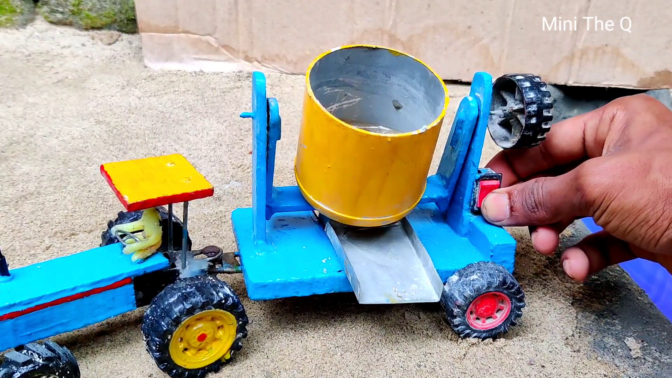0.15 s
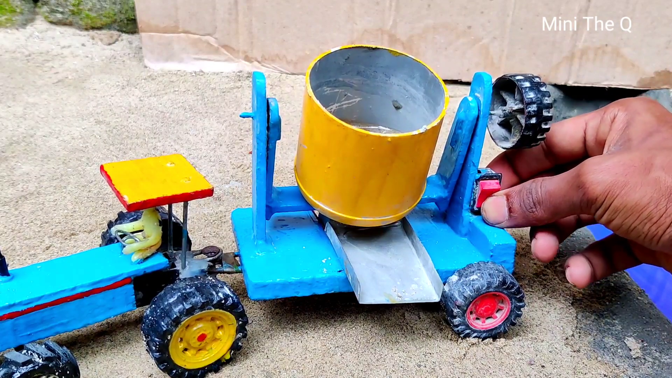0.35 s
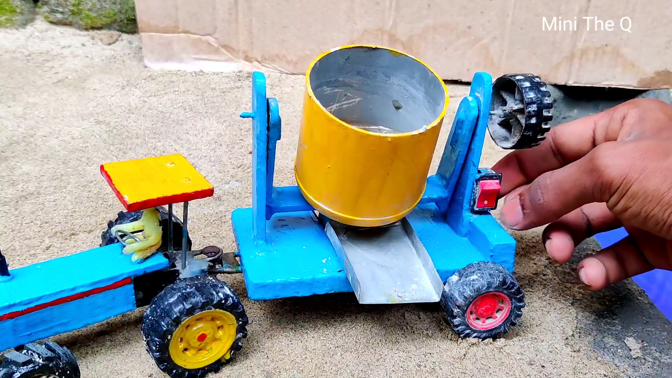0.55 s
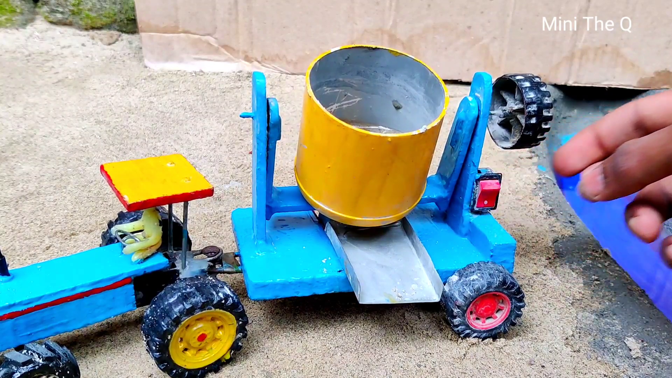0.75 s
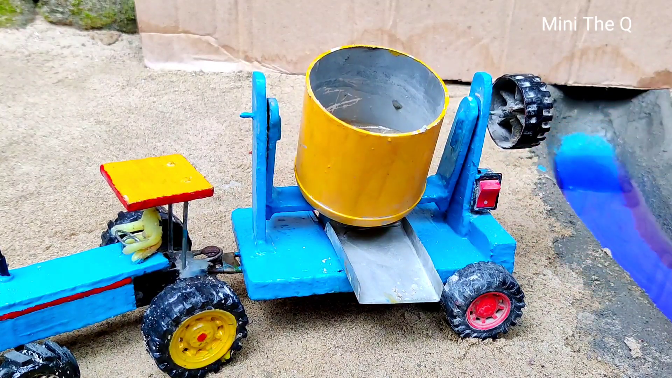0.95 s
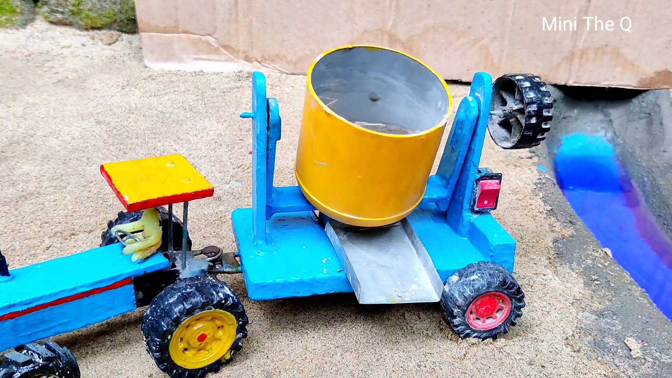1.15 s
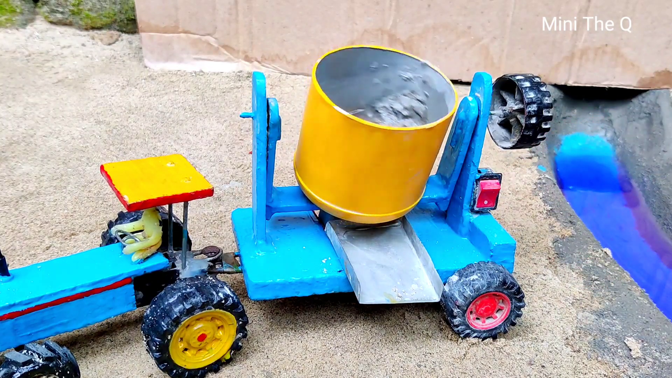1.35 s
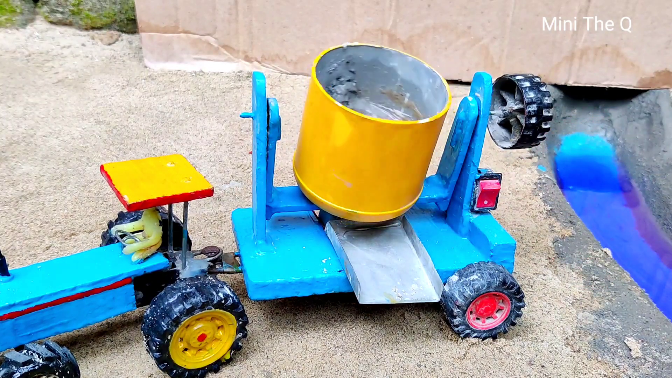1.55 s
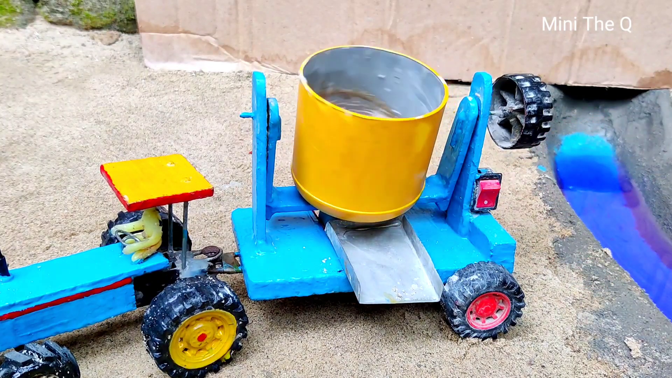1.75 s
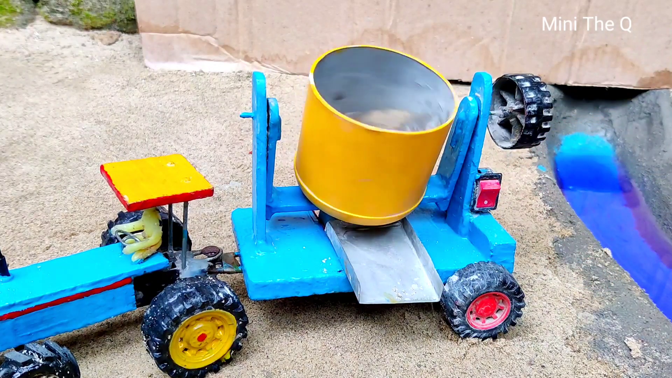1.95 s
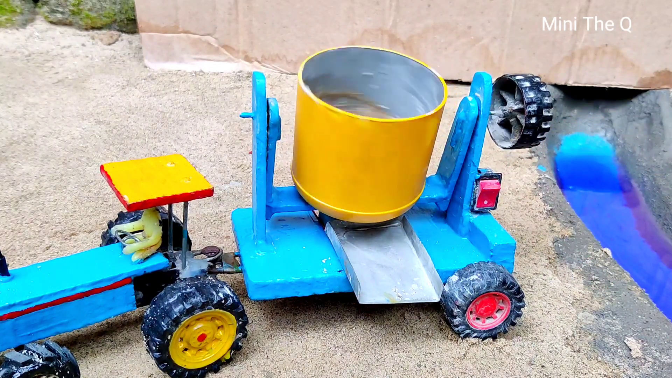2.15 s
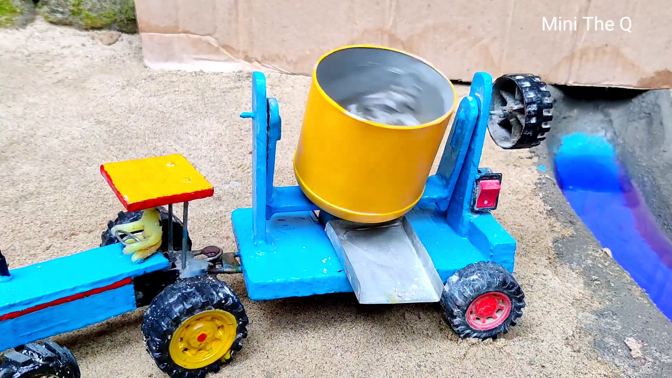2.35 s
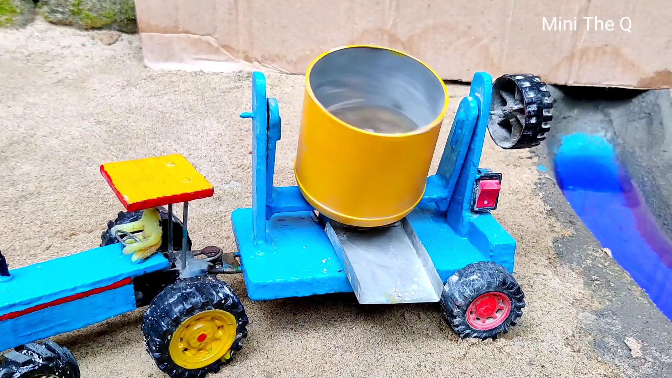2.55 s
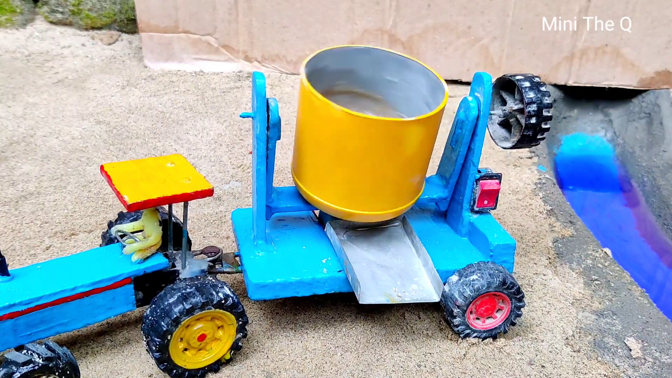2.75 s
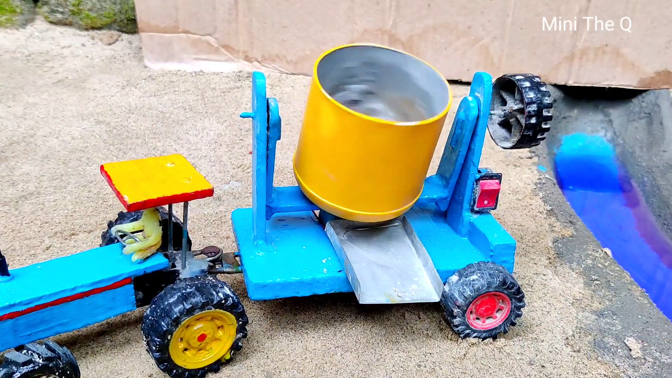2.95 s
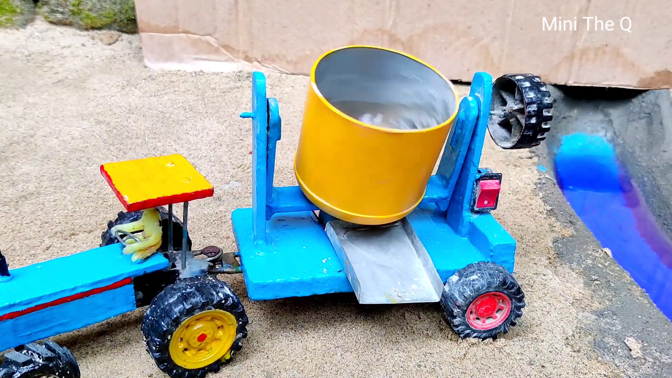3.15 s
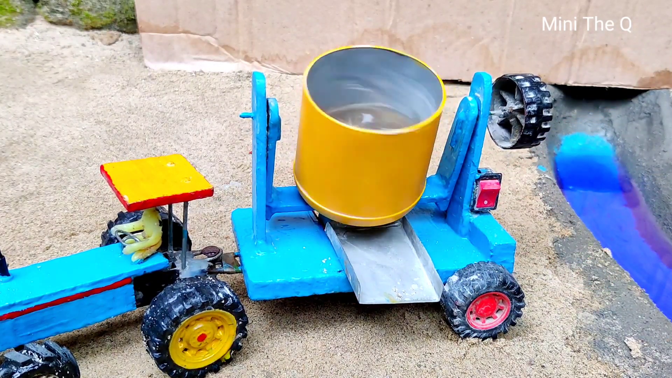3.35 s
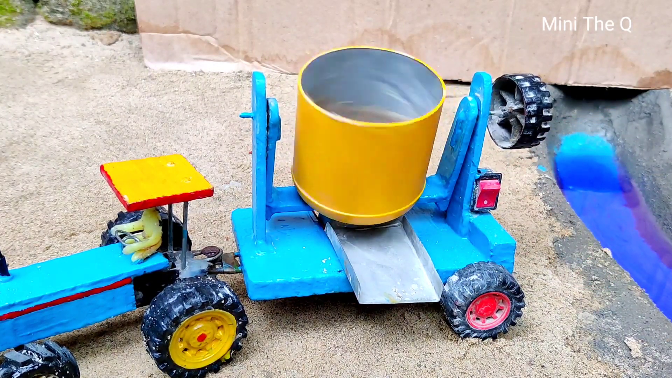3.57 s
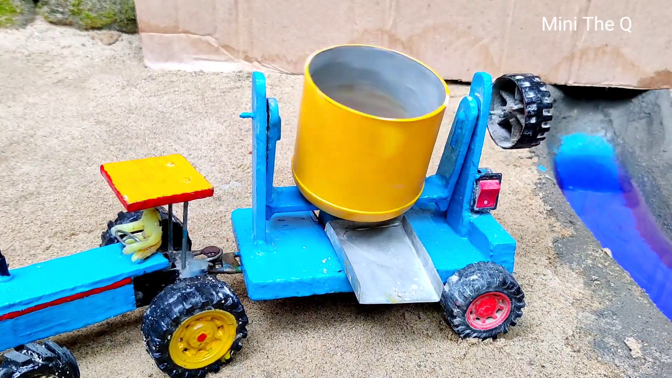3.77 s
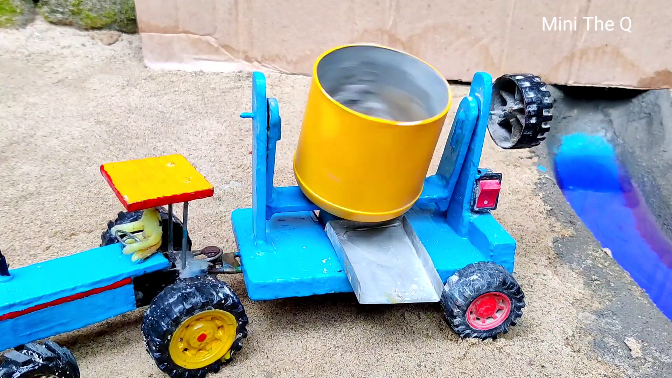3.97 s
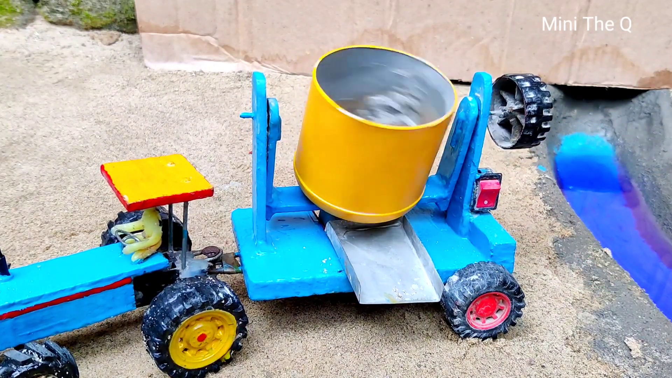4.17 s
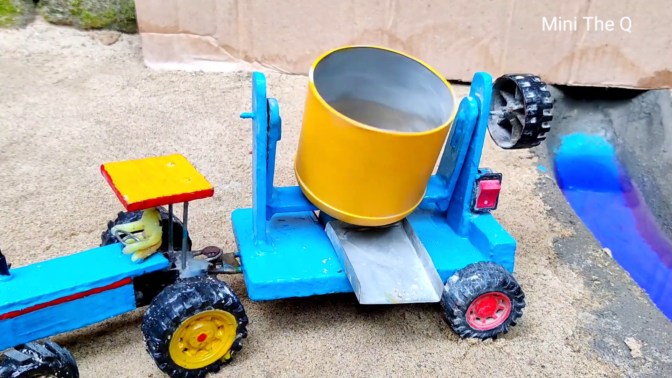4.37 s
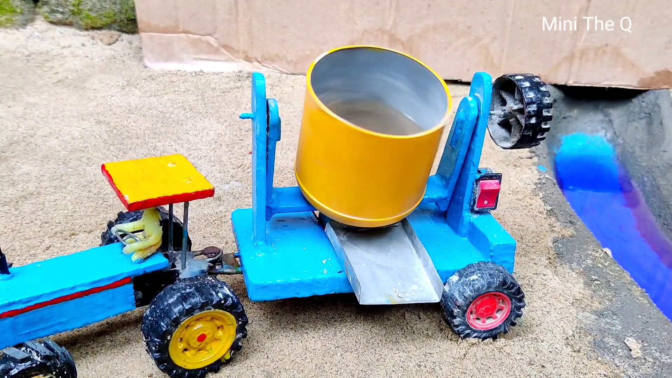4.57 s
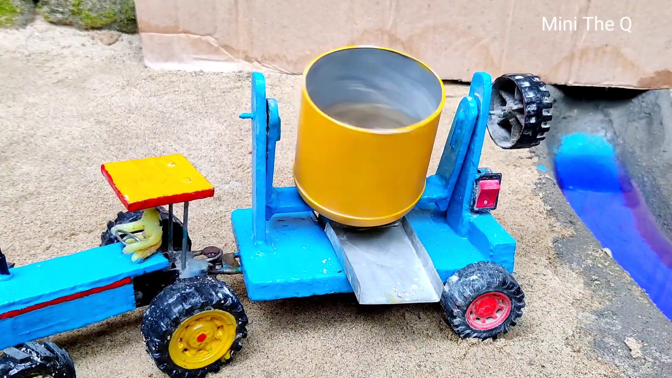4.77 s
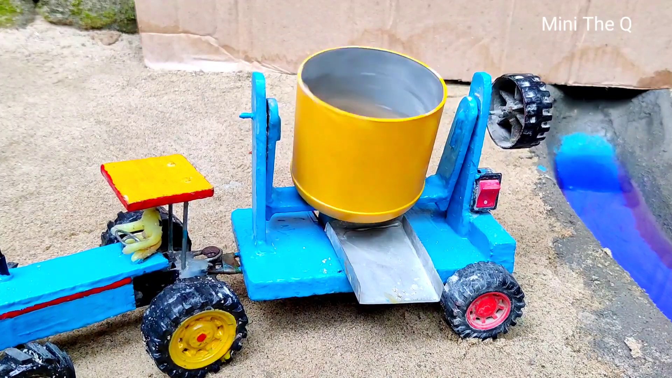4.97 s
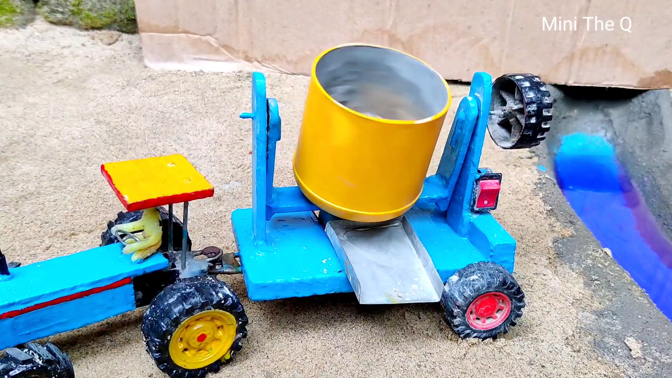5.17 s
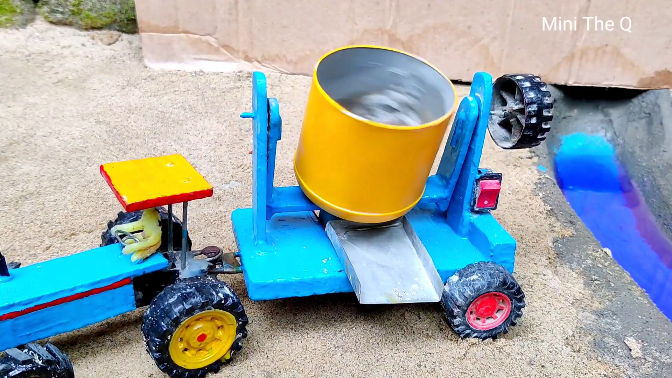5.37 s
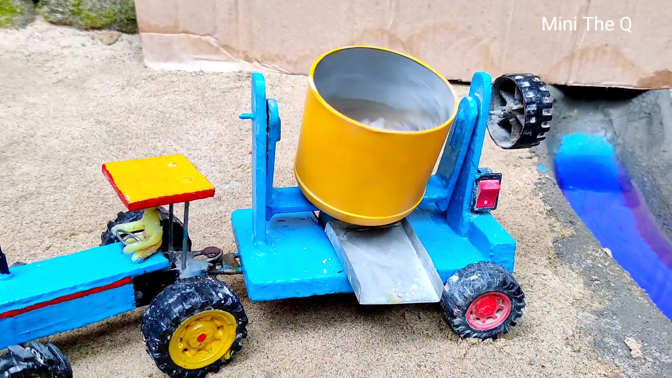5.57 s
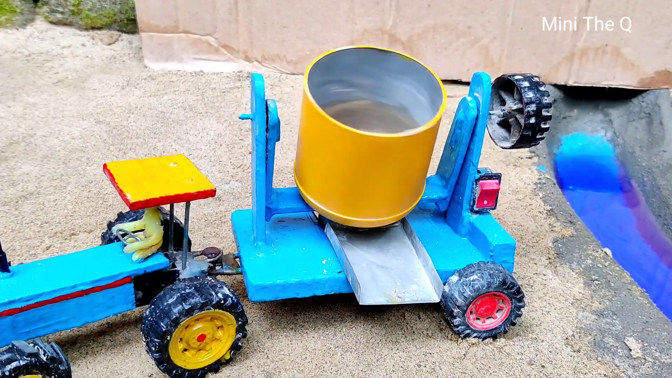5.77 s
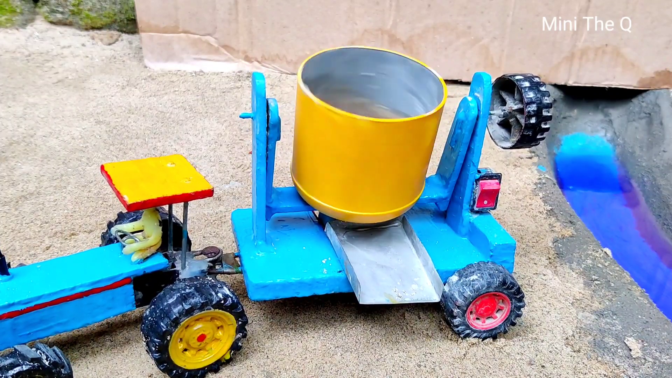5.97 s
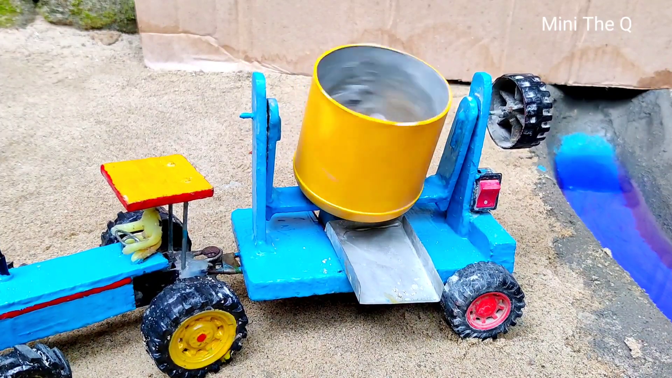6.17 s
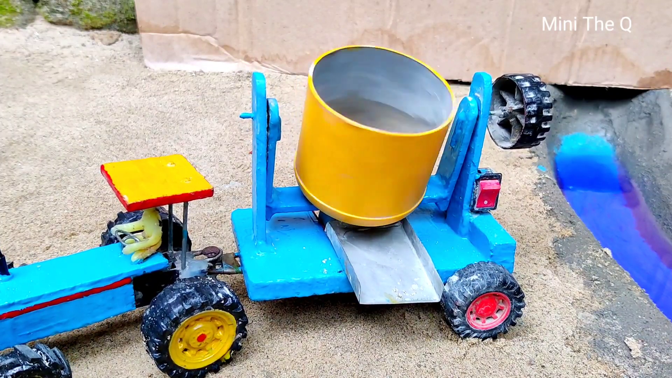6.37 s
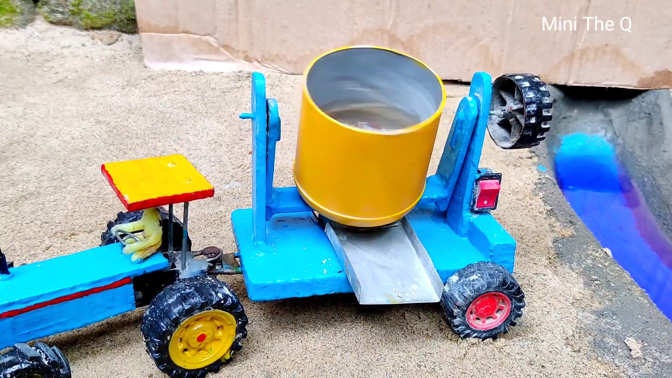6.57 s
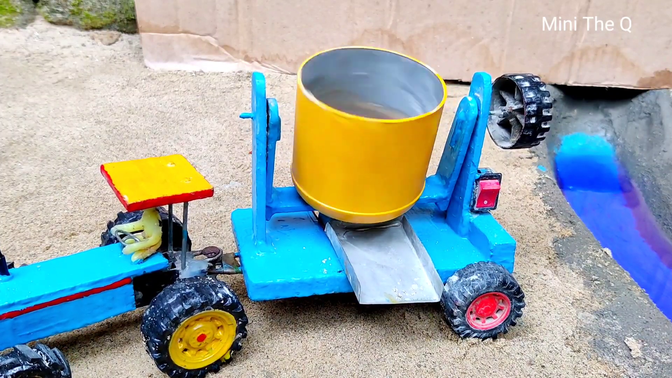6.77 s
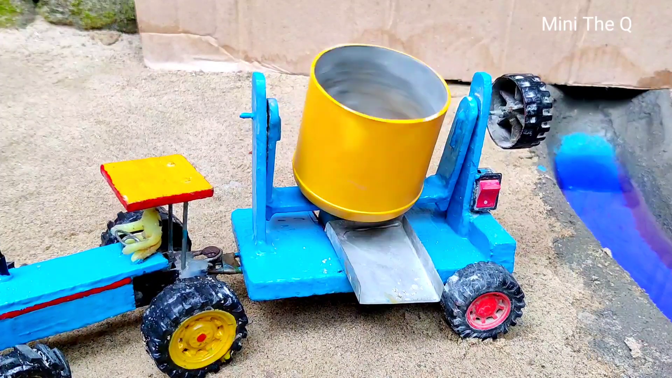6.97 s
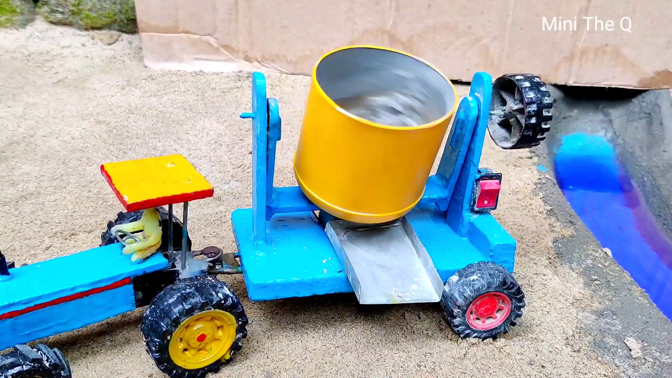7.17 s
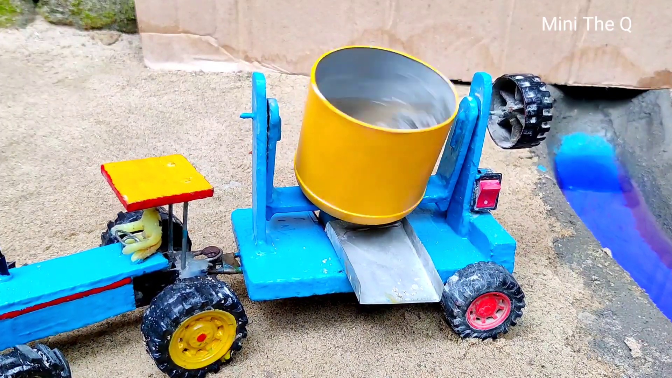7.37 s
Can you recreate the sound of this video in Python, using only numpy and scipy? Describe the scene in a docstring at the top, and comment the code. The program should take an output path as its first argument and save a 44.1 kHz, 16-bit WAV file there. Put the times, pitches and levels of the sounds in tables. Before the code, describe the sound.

The sound begins in a nearly silent yard. At about 0.4 seconds a switch snaps right at the microphone, loud and dry, with a brief low thud and a few faint finger touches on plastic. From 0.7 to 1.2 seconds a very faint, high horn toots three times far away. Just after 1 second a small electric motor gives a barely audible rising whirr. From 1.3 seconds a toy mixer drum starts knocking, softly at first, reaching full strength around 2.3 seconds. It then runs with a fast, even rattle of about ten knocks a second, varying in force. Sharp ticks and light pings on the drum wall fall between the knocks, with a few tiny squeaks between 2 and 3 seconds. Grit hisses inside, and the frame thumps over a low rumble. The mixer is close, mostly on the right, and continues until the end at about 7.4 seconds.

```python
"""In a quiet yard a switch snaps right at the microphone; then a horn sounds three times, far away.
After a second a small motor whirrs up and turns a toy mixer drum: the drive knocks twice a turn and
ticks between, grit hisses, late contacts ping on the drum wall, and the frame thumps on the sand.
The mixer stands at the right microphone port; the left one hears it later, weaker and thinner."""
import sys
import numpy as np
from scipy import signal
from scipy.fft import rfft, irfft
from scipy.io import wavfile
from scipy.ndimage import uniform_filter1d

SR = 44100
rng = np.random.default_rng(int(sys.argv[2]) if len(sys.argv) > 2 else 0)


def to_wav(sig):
    """Store sig (one row per channel, or 1-D mono) as 16-bit WAV at the path in sys.argv[1].

    Samples outside -1..1 are clipped; the rate is SR.
    """
    pcm = np.clip(np.atleast_2d(sig), -1, 1) * 32767
    pcm = np.round(pcm).astype(np.int16)
    wavfile.write(sys.argv[1], SR, pcm.T)  # frames by channels


N = 327222

# yard air over time: time_s, level_db
YARD_LEVEL = [(0, -80.5), (.36, -81.5), (.38, -55), (.6, -63.5), (.8, -61.5), (1.0, -70.5), (1.25, -77.5)]
# spectrum of the yard air: frequency_hz, gain_db
YARD_SPECTRUM = [(15, -30), (25, 6), (242, -5), (2050, -33.5), (3250, -19.5), (4030, -40), (16000, -36.5)]
# blasts of the distant horn: start_s, end_s, gain_db
HORN_BLASTS = [(0.656, 0.803, 2.5), (0.824, 1.006, 1), (1.063, 1.22, 0)]
# horn partials that reach the microphone: pitch_hz, level_db
HORN_PARTIALS = [(2557, -77), (3192, -74.5), (3510, -79)]
# the finger meets the switch, it snaps, the finger slides off: start_s, level_db, t60_s
SWITCH_CONTACTS = [(.353, -50, 0.036), (0.3742, -6, 0.026), (0.411, -40, 0.03), (0.535, -55, 0.03),
                   (.763, -35, 0.025)]
# spectrum of the snap: frequency_hz, gain_db
SNAP_SPECTRUM = [(180, -40), (300, 0), (1000, -17), (1600, -6), (2300, -13), (3100, -4), (3700, -8),
                 (5000, -2), (6500, -1), (10000, -27), (15000, -26), (16000, -34)]
# the switch contact slams shut and bounces: time_s, height
BOUNCES = [(.3739, -1.2), (.3749, -1.3), (.3762, -.9)]
# rattles of the switch, and a low fading thud after the snap: start_s, pitch_hz, level_db, t60_s
RATTLES_AND_THUD = [(.377, 4830, -24, .04), (.396, 4800, -44, .06), (.377, 810, -42, .2),
                    (.39, 45, -32, .4), (.411, 620, -45, .03), (.533, 6200, -47, .02),
                    (.562, 1400, -50, .03), (.599, 6000, -58, .015), (.764, 810, -49, .08)]
# run-up of the motor: time_s, pitch_hz, level_db
MOTOR_RUN_UP = [(1.03, 4600, -90), (1.09, 4990, -76), (1.16, 5460, -79), (1.3, 5920, -86)]
# the running mixer, relative levels: time_s, rumble_db, scrape_db
RUNNING_LEVELS = [(1.0, -87, -98), (1.302, -71, -58.5), (1.5, -53, -46.5), (1.8, -49.5, -42),
                  (2.1, -37, -39), (2.4, -35.5, -34), (3.0, -33.5, -32), (3.6, -32.5, -33),
                  (4.5, -32.5, -32), (5.5, -31.5, -31.5), (6.5, -30.5, -32), (7.42, -32, -32.5)]
# spectrum of the mixer's rumble: frequency_hz, gain_db
RUMBLE_SPECTRUM = [(8.8, -45), (15, -3), (70, 5.5), (207, -11), (335, -16), (400, -79), (520, -45),
                   (880, -120)]
# spectrum of sand sliding in the drum: frequency_hz, gain_db
SAND_SPECTRUM = [(180, -29), (300, -0.5), (413, -2.5), (954, -8.5), (1430, -7.5), (1870, -6), (6450, -9),
                 (9980, -27), (14400, -31), (16500, -47)]
# modes of the frame on the sand: pitch_hz, gain_db, t60_s
FRAME_MODES = [(51, -10.5, 0.28), (120, 2, 0.037), (144.7, -4.5, 0.083), (255, -2, 0.044),
               (343, -4.5, 0.047)]
# thumps of the frame: peak_s, level_db
FRAME_THUMPS = [(1.699, -18.5), (1.749, -28), (1.811, -25), (1.8443, -17), (1.8839, -26), (1.912, -27),
                (2.036, -20.5), (2.087, -27), (2.248, -22), (2.3254, -30), (2.459, -10), (2.5175, -23),
                (2.658, -11.5), (2.722, -17), (2.8239, -16), (2.857, -5.5), (2.9303, -34), (3.0771, -18.5),
                (3.2703, -9), (3.467, -12.5), (3.6605, -18), (3.8478, -11.5), (3.9064, -24), (4.1919, -14),
                (4.2212, -15), (4.4036, -11), (4.5678, -13.5), (4.5978, -12), (4.751, -13.5), (4.7923, -16),
                (4.9677, -11), (5.1267, -23), (5.1571, -5.5), (5.5008, -16), (5.53, -11), (5.6867, -12),
                (5.8736, -15), (6.0597, -22), (6.088, -9), (6.2495, -16.5), (6.2764, -12), (6.4373, -16),
                (6.468, -13.5), (6.6269, -10), (6.8146, -16), (6.843, -11.5), (6.9977, -20), (7.1794, -8.5),
                (7.2717, -21.5), (7.3633, -9.5)]
# modes of the drum and gear box: pitch_hz, gain_db, t60_s
DRUM_MODES = [(265, 0, 0.018), (336, -7, 0.074), (699, 0.5, 0.0065), (1058, -1, 0.021), (1405, 0, 0.026),
              (1478, 4, 0.0073), (1705, -4, 0.0078), (2110, -6, 0.022), (3855, -2.5, 0.016),
              (4100, -9, 0.016), (2654, 4.5, 0.0033), (3040, 4, 0.0037), (5120, -9.5, 0.012),
              (6010, -11.5, 0.015), (6790, -1.5, 0.0067), (7640, -16, 0.0039)]
# sharp, bright ticks of the turning mixer between its knocks: time_s, level_db
SHARP_TICKS = [(1.436, -40), (1.732, -33.5), (1.7492, -38), (1.84, -31), (2.059, -31), (2.083, -28.5),
               (2.2737, -33), (2.295, -25), (2.339, -19.5), (2.354, -38), (2.552, -28), (2.6346, -25),
               (2.9843, -21), (3.0762, -29.5), (3.3672, -25), (3.4656, -21), (3.554, -35), (3.6592, -15.5),
               (3.8477, -15.5), (4.033, -15.5), (4.219, -14.5), (4.4038, -10), (4.577, -30), (4.594, -13),
               (4.761, -32), (4.7827, -13), (4.965, -16), (5.1517, -16.5), (5.3374, -15.5), (5.412, -25),
               (5.525, -19.5), (5.545, -26), (5.6184, -29), (5.7128, -19.5), (5.8914, -19.5),
               (6.3516, -23.5), (6.5084, -21.5), (7.3049, -29.5)]
# light late contacts on the drum wall: peak_s, level_db
WALL_PINGS = [(1.3468, -42), (1.6212, -46), (1.725, -32), (1.8583, -38), (2.0246, -29.5), (2.343, -25),
              (2.634, -32), (2.9437, -24), (3.25, -24), (3.343, -25.5), (3.6312, -24), (3.7302, -22),
              (3.816, -29), (4.196, -17.5), (4.3896, -20.5), (4.5778, -15), (4.6678, -22), (4.7632, -18.5),
              (4.9557, -19), (5.1378, -17), (5.324, -26), (5.3553, -19.5), (5.5118, -18), (5.6034, -24),
              (5.787, -27), (6.0718, -16.5), (6.1593, -23), (6.261, -22), (6.4502, -18), (6.6376, -19.5),
              (6.899, -21), (7.099, -21), (7.1906, -22), (7.376, -17)]
# short squeaks just before a hard knock: start_s, level_db
SQUEAKS = [(2.2753, -30), (2.71, -27), (2.913, -32), (2.9165, -28)]
# drive knocks, alternately the second and first of a turn: start_s, level_db, relative_treble_db
DRIVE_KNOCKS = [(1.296, -41.5, -13), (1.403, -35, -11), (1.505, -25.5, -18.5), (1.604, -27.5, -28),
                (1.703, -23, -25), (1.804, -21.5, -17.5), (1.905, -26, -44), (2.008, -24, -23),
                (2.107, -23.5, -8.5), (2.21, -26, -13), (2.323, -3, -19.5), (2.426, -52, -17),
                (2.516, -7.5, -20.5), (2.615, -18, -13), (2.722, -1.5, -17), (2.815, -19, -17),
                (2.9248, -3.5, -12.5), (3.015, -24.5, -14), (3.125, -11.5, -9), (3.228, -16.5, -6.5),
                (3.326, -13.5, -12), (3.426, -14, -10.5), (3.517, -10.5, -16.5), (3.611, -17, -6),
                (3.712, -15.5, -4.5), (3.795, -24, -13), (3.9, -6.5, -14), (3.991, -6.5, -11),
                (4.085, -12.5, -11.5), (4.184, -12, -6.5), (4.273, -6.5, -11), (4.371, -11, -15),
                (4.462, -8, -17.5), (4.56, -6, -16), (4.65, -8.5, -19), (4.745, -13.5, -7.5),
                (4.838, -4, -16), (4.934, -8, -10.5), (5.019, -15.5, -12.5), (5.119, -5.5, -15.5),
                (5.21, -13.5, -14), (5.306, -10, -8.5), (5.398, -6.5, -13.5), (5.492, -8, -8.5),
                (5.584, -6, -17), (5.679, -5, -17), (5.768, -6.5, -17), (5.863, -12, -6),
                (5.948, -22, -4.5), (6.052, -8, -16.5), (6.144, -12.5, -15), (6.241, -16, -3),
                (6.327, -14, -11.5), (6.43, -15.5, -2), (6.517, -18, -26), (6.619, -14, -4.5),
                (6.705, -11.5, -13.5), (6.806, -11.5, -9.5), (6.882, -17.5, -10.5), (6.99, -2.5, -21),
                (7.08, -8.5, -10.5), (7.172, -27, 10.5), (7.264, -7, -16.5), (7.357, -12.5, -15)]
# filter on the mixer's sound at the left, far port: frequency_hz, gain_db
FAR_PORT_RESPONSE = [(60, -17.5), (200, -18), (700, -15), (1300, -17.5), (2400, -17), (4400, -16.5),
                     (6500, -15), (7600, -30.5), (12000, -16.5)]

RASP_EDGES_HZ = (1000, 1900, 3000, 4300, 5800, 8000)
CLACK_HZ = (1040, 2110, 3855, 4100)   # hard blows bite into the drum modes near these
PING_HZ, SQUEAK_HZ = 1385, 2720
# pairs: second knock of a turn, first knock
LOWER_RING_DB, UPPER_RING_DB = (-4, -3.5), (8.5, 2)
BLOW_LAG_S, BLOW_DB = (.004, .003), (-2, -6.5)
LULL_DB, SCRAPE_DB = (-1.5, -9.5), (-2, 0)
TIME_S = np.arange(N) / SR
BIN_HZ = np.arange(N // 2 + 1) * SR / N


def from_db(db):
    return 10 ** (np.asarray(db) / 20)


def unit_rms(x):
    return x / np.sqrt(np.mean(x ** 2) + 1e-20)


def curves(rows):
    """Columns of a time table at every sample."""
    times, *columns = np.transpose(rows)
    return [np.interp(TIME_S, times, column) for column in columns]


def colour(x, points):
    """Filter by a table of frequency_hz, gain_db."""
    hz, db = np.transpose(points)
    gain_db = np.interp(np.log(np.maximum(BIN_HZ, 1)), np.log(hz), db)
    return irfft(rfft(x) * from_db(gain_db), N)


def coloured_noise(points):
    return unit_rms(colour(rng.standard_normal(N), points))


def butter(x, hz, kind="low", order=2):
    return signal.sosfilt(signal.butter(order, hz, kind, fs=SR, output="sos"), x)


def drift(rate_hz):
    """Smooth random wander with an rms of 1."""
    r = np.exp(-2 * np.pi * rate_hz / SR)
    return unit_rms(signal.lfilter([1], [1, -2 * r, r * r], rng.standard_normal(N + SR))[SR:])


def train(times_s, sizes):
    """Clicks of the given sizes at the given times."""
    at = np.clip(np.ravel(times_s) * SR, 0, N - 1).astype(int)
    return np.bincount(at, np.ravel(sizes), N) + 1e-18


def ring(clicks, hz, t60_s):
    """A unit click sets a sine of height 1 ringing."""
    r, w = from_db(-60 / (t60_s * SR)), 2 * np.pi * hz / SR
    return signal.lfilter([0, np.sin(w)], [1, -2 * r * np.cos(w), r * r], clicks)


def fade(clicks, t60_s):
    """A unit click starts a decaying envelope."""
    return signal.lfilter([1], [1, -from_db(-60 / (t60_s * SR))], clicks)


def scatter(db, spread_db):
    """Amplitudes scattered at random around the given levels."""
    return from_db(db + rng.normal(0, spread_db, np.shape(db)))


def yard_air():
    """Faint air all around the microphone; it rises at the snap and sinks back."""
    return from_db(curves(YARD_LEVEL)[0]) * coloured_noise(YARD_SPECTRUM)


def distant_horn():
    """Only a few upper partials carry this far; they waver in the air."""
    gate = sum(from_db(db) * np.clip(np.minimum(TIME_S - start, end - TIME_S) / .031, 0, 1)
               for start, end, db in HORN_BLASTS)
    return gate * sum(from_db(db - 2 + 2 * drift(4.1)) * np.sin(2 * np.pi * hz * TIME_S)
                      for hz, db in HORN_PARTIALS)


def overload_swing(start_s=.3738, rise_s=.0014, hz=8.1):
    """The snap overloads the recorder, which recovers with a slow sub-bass swing."""
    age = np.maximum(TIME_S - start_s, 0)
    envelope = .75 * (1 - np.exp(-age / rise_s)) * np.exp(-26 * age)
    return envelope * np.cos(2 * np.pi * hz * age + .85)


def close_switch():
    """A dry crack that overloads the recorder, amid duller finger touches on a plastic housing."""
    noise = coloured_noise(SNAP_SPECTRUM)
    meet, crack, *slides = [fade(train(s, from_db(db)), t60) for s, db, t60 in SWITCH_CONTACTS]
    pat = unit_rms(butter(rng.standard_normal(N), [150, 900], "band"))
    finger = (butter(noise, 5000, order=1) + from_db(-9) * pat) * sum(slides, meet)
    start_s, level_db, _ = np.transpose(SWITCH_CONTACTS)
    tail = fade(train(start_s, from_db(level_db - 33)), t60_s=.33)
    snap = noise * (crack + tail)
    housing = ring(from_db(-47) * finger, hz=810, t60_s=.06)
    rattles_and_thud = sum(ring(train(s, from_db(db)), hz, t60) for s, hz, db, t60 in RATTLES_AND_THUD)
    slam = sum(height * np.exp(-((TIME_S - s) / 55e-6) ** 2) for s, height in BOUNCES)
    return np.clip(slam + snap + finger + housing + rattles_and_thud + overload_swing(), -.8, .8)


def motor_whirr():
    """Two diffuse bands of noise that climb as the motor gathers speed."""
    hz, db = curves(MOTOR_RUN_UP)
    gate = np.abs(TIME_S - 1.18) < .16
    phase = 2 * np.pi * np.cumsum(hz) / SR
    upper = drift(600) * np.sin(phase)
    lower = from_db(2) * drift(640) * np.sin(.6 * phase)
    return gate * from_db(db) * (upper + lower)


def knock_columns():
    """Start, level and treble of each knock, and 1 if it is the first of its turn, else 0."""
    start_s, db, treble_db = np.transpose(DRIVE_KNOCKS)
    return start_s, db, treble_db, np.arange(len(start_s)) % 2


def load_scrape_db():
    """The load lets go just before each knock and scrapes again after it."""
    start_s, _, _, first = knock_columns()
    lull_db, scrape_db = np.take(LULL_DB, first), np.take(SCRAPE_DB, first)
    times = start_s[:, None] + [-.018, -.004, .014, .045]
    levels = np.transpose([lull_db, lull_db, scrape_db, scrape_db])
    return curves(RUNNING_LEVELS)[1] + np.interp(TIME_S, times.ravel(), levels.ravel())


def mixer_rumble(scrape_db):
    """The wavering bass of the running mixer; the load's lulls reach it too."""
    lulls_db = scrape_db - uniform_filter1d(scrape_db, size=SR // 2)
    level_db = curves(RUNNING_LEVELS)[0] + 4.75 + lulls_db + 2.97 * drift(41)
    return from_db(level_db) * coloured_noise(RUMBLE_SPECTRUM)


def grit(scrape_db):
    """Sand hisses in the drum, flares at knocks and ticks and keeps the wall ringing; two signals."""
    start_s, db, treble_db, _ = knock_columns()
    tick_s, tick_db = np.transpose(SHARP_TICKS)
    knock_bursts = fade(train(start_s + .00031, from_db(db + treble_db - 12)), t60_s=.081)
    knock_bursts = uniform_filter1d(knock_bursts, size=180)   # swells over a few ms
    tick_bursts = fade(train(tick_s, from_db(tick_db - 8.5)), t60_s=.017)
    level = from_db(scrape_db - 4) + knock_bursts + tick_bursts
    # each band rasps on its own, and all share a quick flicker
    band = np.searchsorted(RASP_EDGES_HZ, BIN_HZ)
    rasps = [from_db(2.5 * drift(28)) for _ in range(len(RASP_EDGES_HZ) + 1)]
    grain_sizes = from_db(5.2 * np.minimum(rng.exponential(1, (2, N)), 4))
    faces = []
    for grains in grain_sizes * rng.standard_normal((2, N)):
        hiss = unit_rms(colour(grains, SAND_SPECTRUM))
        spectrum = rfft(hiss)
        rasping = sum(irfft(spectrum * (band == k), N) * rasp for k, rasp in enumerate(rasps))
        flicker = from_db(3 * drift(114))
        wall = ring(level * hiss * from_db(5.5 * drift(87)), hz=1402.4, t60_s=.076)
        faces.append(level * flicker * rasping + from_db(-40) * wall)
    return faces


def frame_thumps(rise_s=.00358):
    """The frame rocks on the sand: a soft push into its low modes."""
    peak_s, db = np.transpose(FRAME_THUMPS)
    frame = 0
    for k, (hz, mode_db, t60) in enumerate(FRAME_MODES):
        sizes = (1 if k else -1) * scatter(db + mode_db - 5.5, 1.5)
        start_s = peak_s - rise_s + rng.uniform(0, .00076, len(peak_s))
        frame += ring(train(start_s, sizes), hz, t60)
    return butter(frame, 450)


def soft_pushes(rows, hz, gain_db, lead_s=0):
    """A soft contact pushes once a cycle, so the ring builds over three cycles."""
    time_s, db = np.transpose(rows)
    return train(time_s[:, None] - lead_s + np.arange(3) / hz, np.repeat(from_db(db + gain_db), 3))


def light_contacts(hz, mode_db, polarity):
    """Pings and squeaks push a drum mode near their pitch; sharp ticks strike the high modes."""
    hits = 0
    if abs(hz - PING_HZ) < 100:
        hits += soft_pushes(WALL_PINGS, PING_HZ, mode_db - 5, lead_s=.0025)
    if abs(hz - SQUEAK_HZ) < 150:
        hits += soft_pushes(SQUEAKS, hz, gain_db=5)
    if hz > 3200:
        tick_s, tick_db = np.transpose(SHARP_TICKS)
        hits += polarity * train(tick_s - .0003, scatter(tick_db + .3 * mode_db - 1.5, 2.5))
    return hits


def crackle(blow_s, blow_treble_db):
    """The bright edge of blows and ticks: a very short burst of high noise on each."""
    tick_s, tick_db = np.transpose(SHARP_TICKS)
    edges = train(np.r_[blow_s, tick_s], scatter(np.r_[blow_treble_db, tick_db] - 15, 3))
    return butter(fade(edges, t60_s=.0026) * rng.standard_normal(N), 5000, "high")


def knock_tone_db(hz, db, treble_db, first):
    """How each knock feeds a mode; hard knocks give the low modes a smaller share."""
    if hz < 1700:
        return np.take(LOWER_RING_DB, first) - .57 * np.maximum(db + 15.5, 0)
    upper_db = np.take(UPPER_RING_DB, first) + .66 * treble_db
    if hz < 2400:
        return upper_db
    return treble_db if hz > 4300 else (treble_db + upper_db) / 2


def drum_knocks(contacts=7, bite_from_db=-11):
    """Each knock is a touch, then a clatter around one hard blow; light contacts ring the same drum."""
    start_s, db, treble_db, first = knock_columns()
    lags_s = np.cumsum(.0032 * rng.uniform(.4, 1.1, (len(start_s), contacts)), axis=1)
    lags_s -= lags_s[:, :1]
    # the clatter grows for 4 ms, then weakens
    swell_db = -1800 * np.abs(lags_s - .004) - 3 + rng.normal(0, 2.9, lags_s.shape)
    blow_s = start_s + np.take(BLOW_LAG_S, first)
    excess_db = np.maximum(db - bite_from_db, 0) * (1 - first)   # only a turn's second knock bites
    drum = 0
    for k, (hz, mode_db, t60) in enumerate(DRUM_MODES):
        polarity = (-1) ** k
        strike_db = db + knock_tone_db(hz, db, treble_db, first) + mode_db
        clatter = scatter(strike_db[:, None] + swell_db, 2.02) * rng.choice([-1, 1], lags_s.shape)
        blow = polarity * scatter(strike_db + np.take(BLOW_DB, first), 3.2)
        touch = scatter(strike_db - 9, 1.6)
        hits = train(start_s, touch) + train(start_s[:, None] + lags_s, clatter) + train(blow_s, blow)
        if np.abs(np.log(hz / np.array(CLACK_HZ))).min() < .03:
            bite = from_db((1.4 if hz < PING_HZ else 1) * excess_db) - 1
            drum += ring(train(blow_s, blow * bite), hz, t60)
            t60 *= .55   # lighter contacts leave the parts pressed together, so the ring dies sooner
        drum += ring(hits + light_contacts(hz, mode_db, polarity), hz, t60)
    softened = butter(drum, 9000, order=1)   # plastic contacts are not quite hard
    return softened + crackle(blow_s, db + treble_db)


def scene(lag_samples=20):
    """Yard, horn, switch and whirr sit centre; the rest of the mixer stands at the right port."""
    running = TIME_S > 1
    scrape_db = load_scrape_db()
    near_grit, far_grit = grit(scrape_db)
    near_rumble, far_rumble = mixer_rumble(scrape_db), mixer_rumble(scrape_db)
    knocks, thumps = drum_knocks(), frame_thumps()
    right = running * (knocks + thumps + near_grit + near_rumble)
    # the left port hears the mixer late, and partly from its other faces
    shared = .53 * knocks + .08 * thumps + .31 * near_grit + .063 * near_rumble
    other_faces = 1.1 * drum_knocks() + .14 * frame_thumps() + 2.6 * far_grit + far_rumble
    left = running * (shared + other_faces)
    left = colour(np.r_[np.zeros(lag_samples), left[:-lag_samples]], FAR_PORT_RESPONSE)
    return np.array([left, right]) + close_switch() + distant_horn() + yard_air() + motor_whirr()


def record(dry):
    """The recorder flattens the peaks and cuts the top octave short at 16.6 kHz."""
    limited = dry / (1 + np.abs(dry) ** 6) ** (1 / 6)
    return signal.sosfilt(signal.cheby2(12, 70, 16600, fs=SR, output="sos"), limited)


dry = scene()
out = record(dry)
to_wav(out)
```